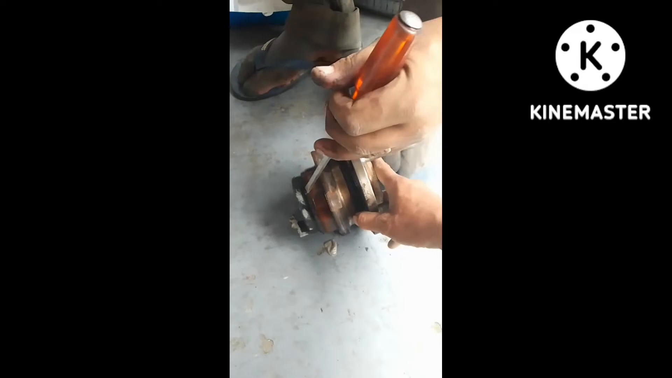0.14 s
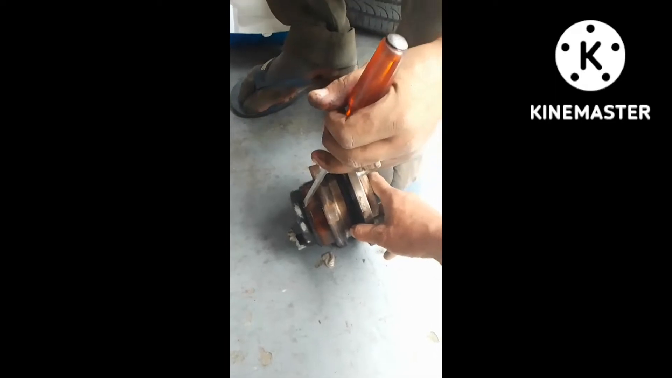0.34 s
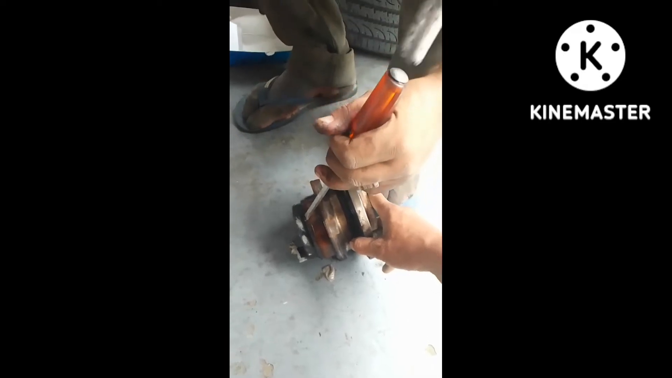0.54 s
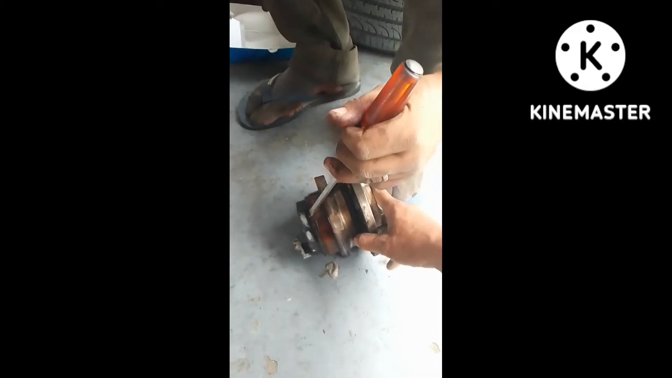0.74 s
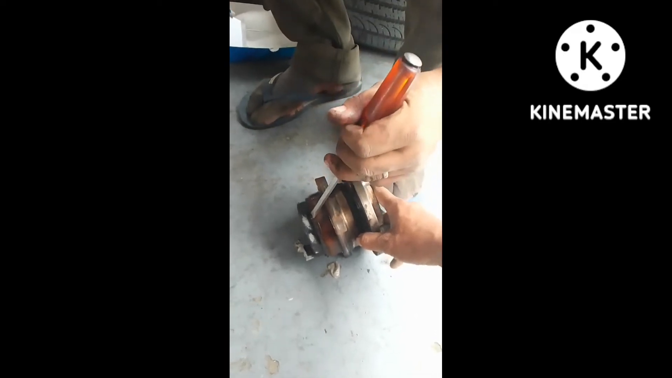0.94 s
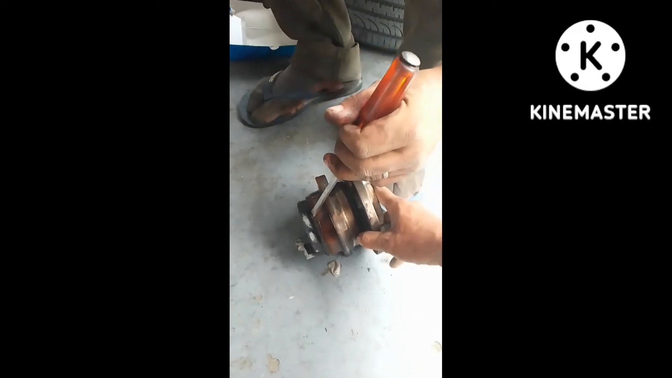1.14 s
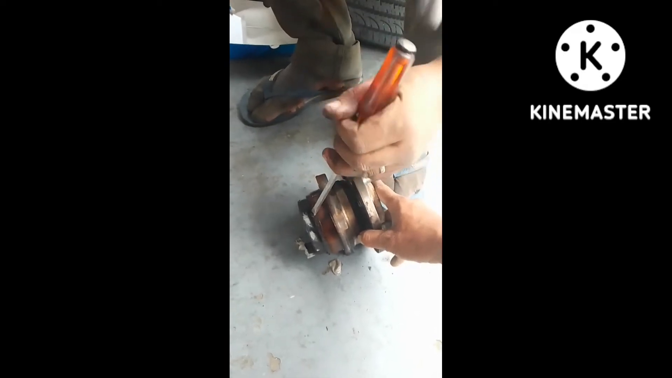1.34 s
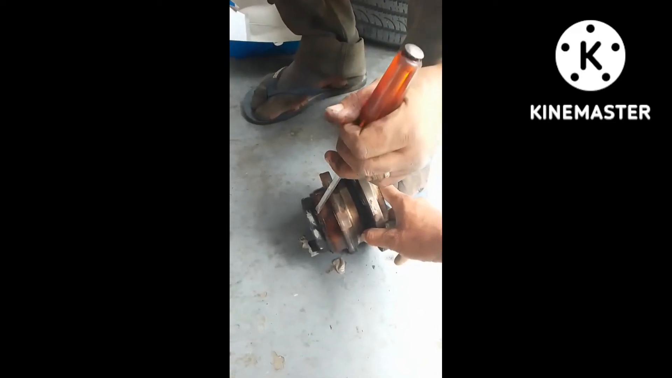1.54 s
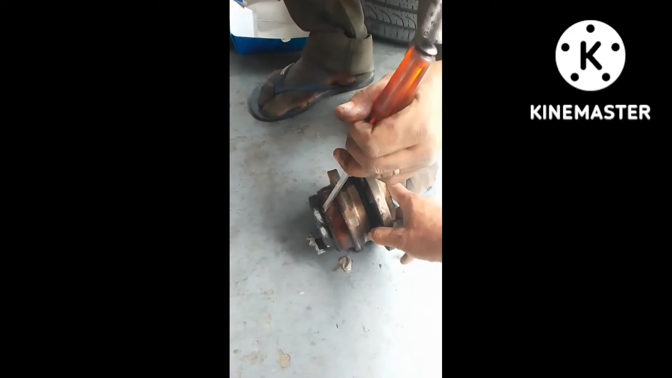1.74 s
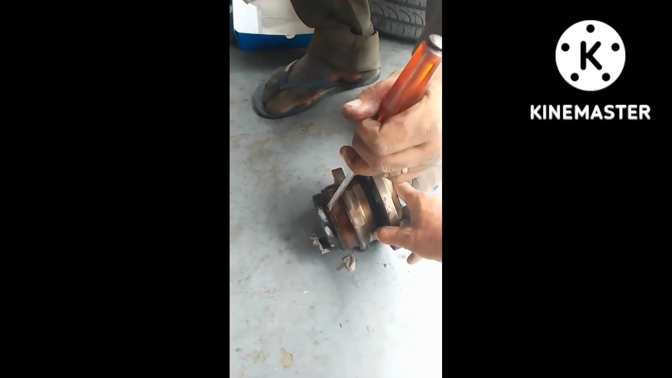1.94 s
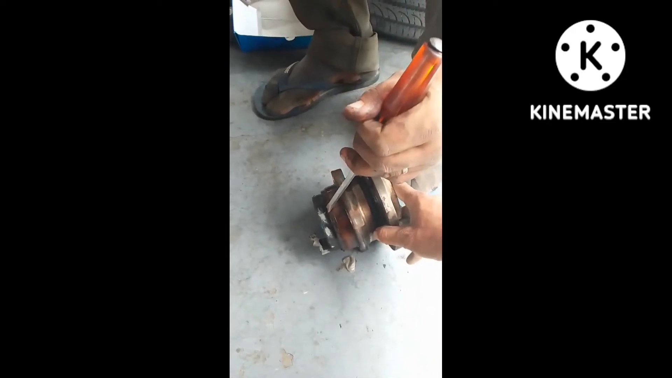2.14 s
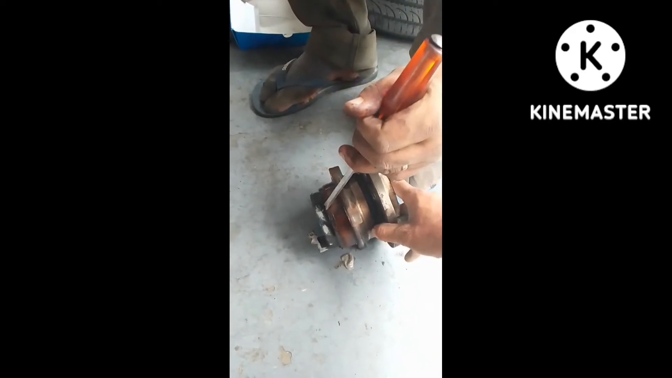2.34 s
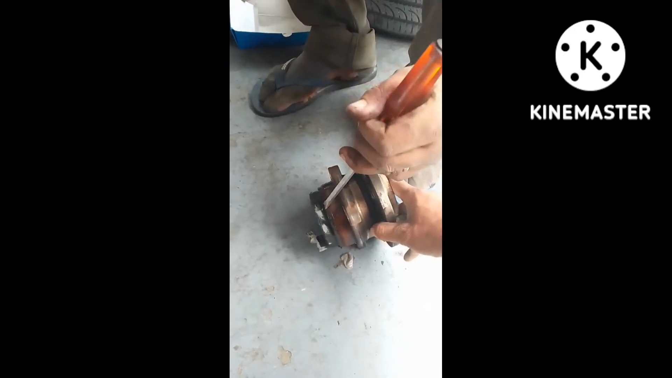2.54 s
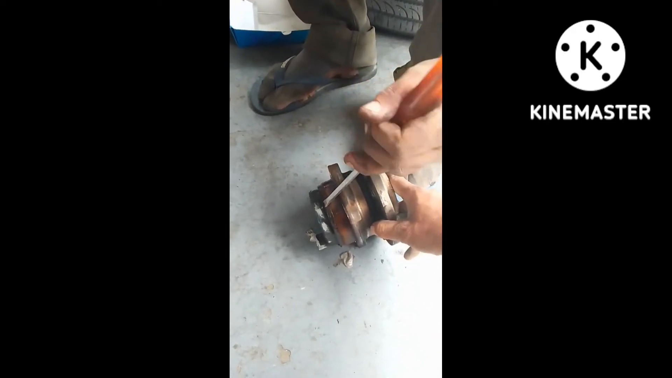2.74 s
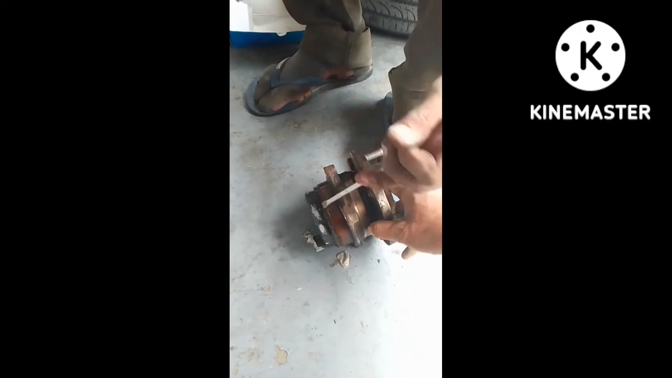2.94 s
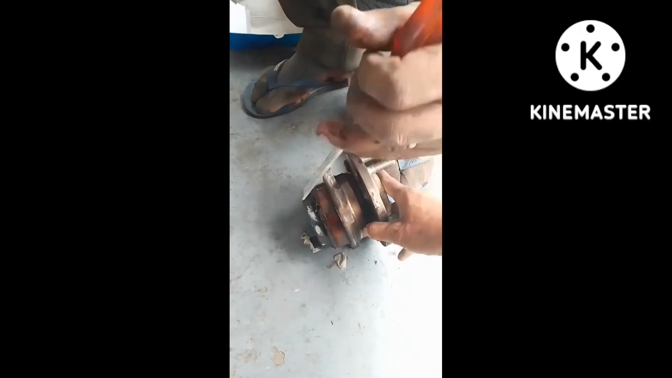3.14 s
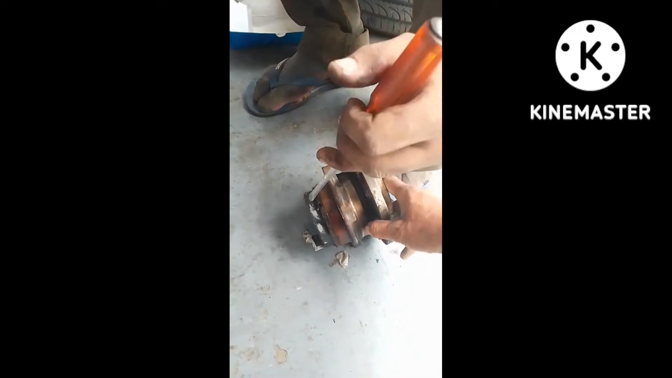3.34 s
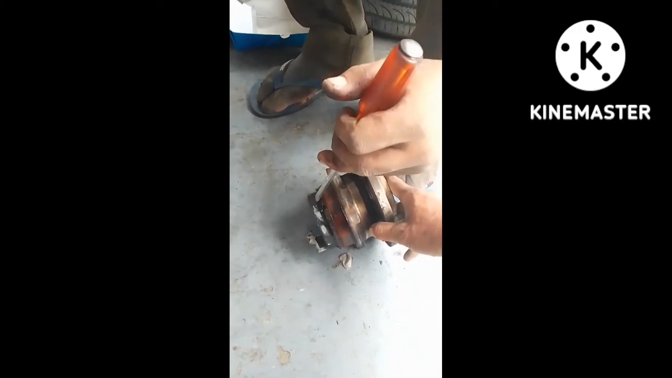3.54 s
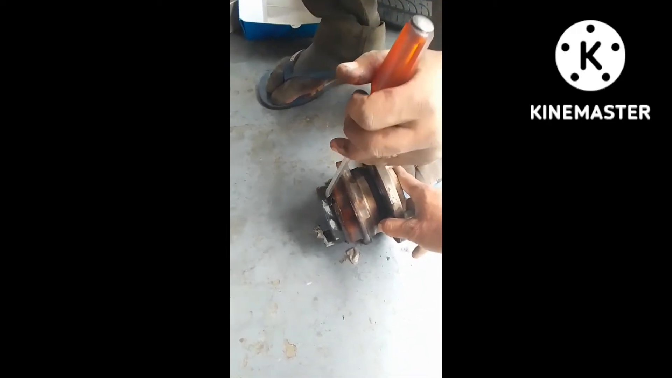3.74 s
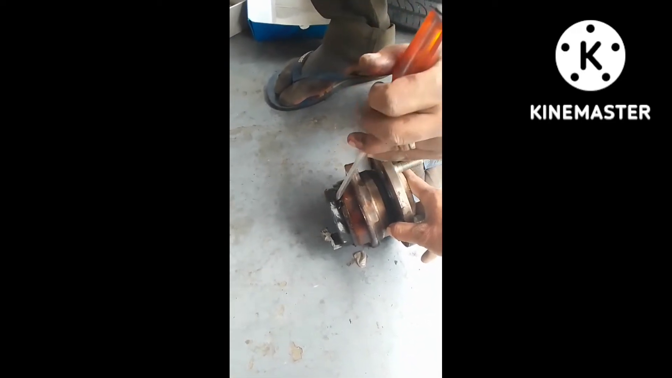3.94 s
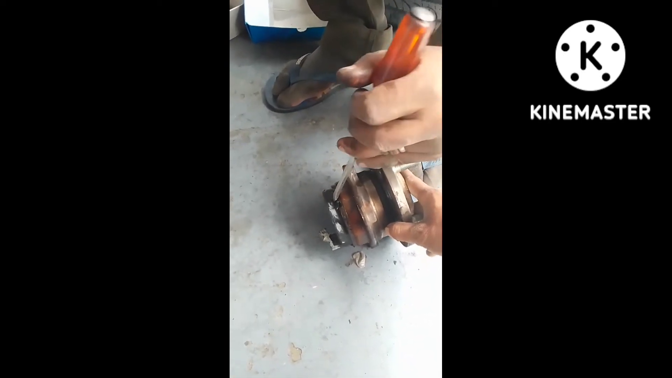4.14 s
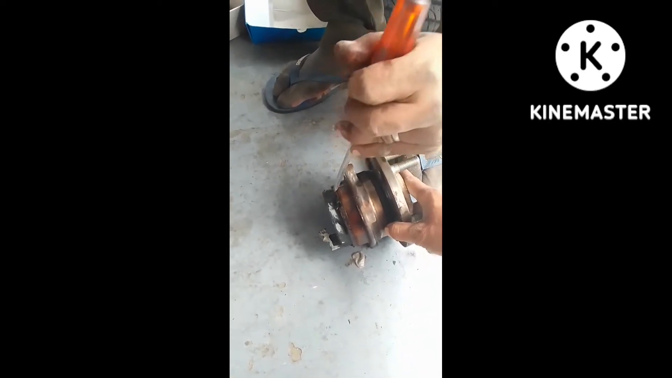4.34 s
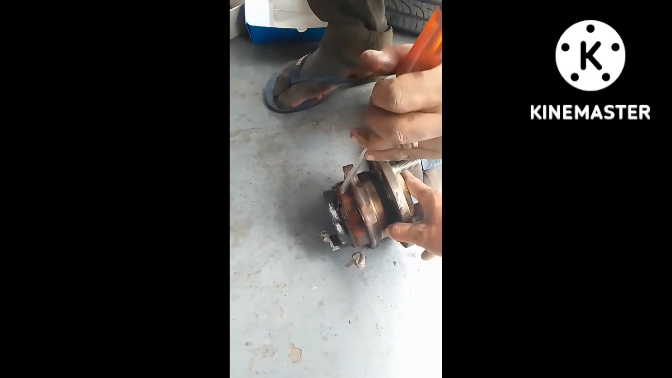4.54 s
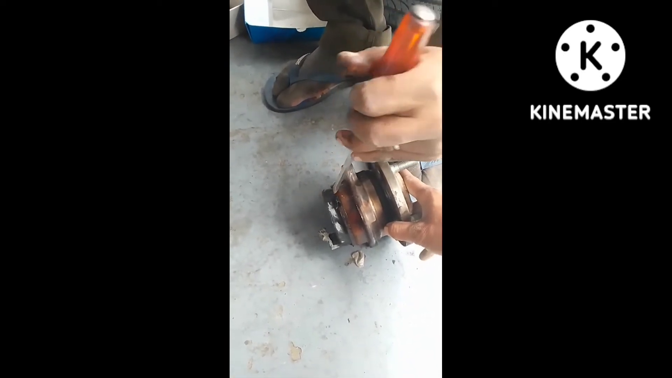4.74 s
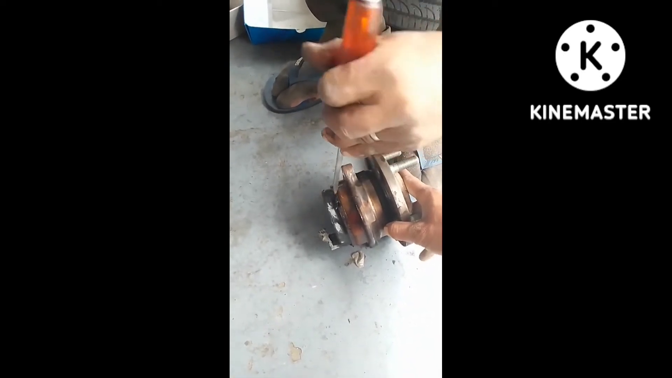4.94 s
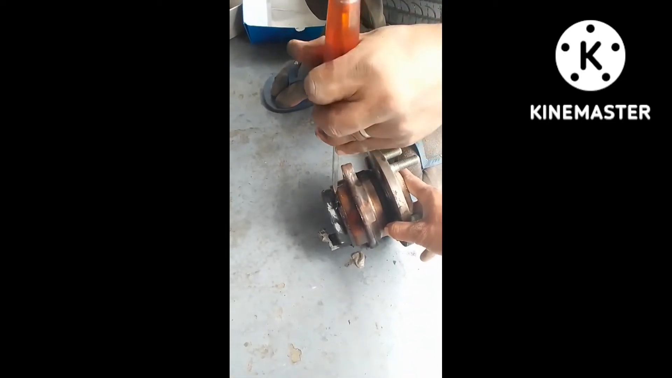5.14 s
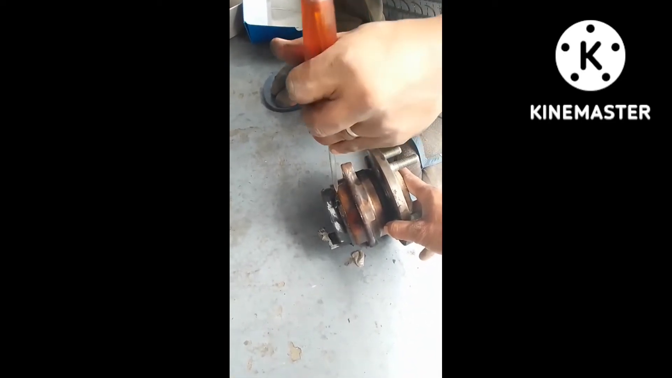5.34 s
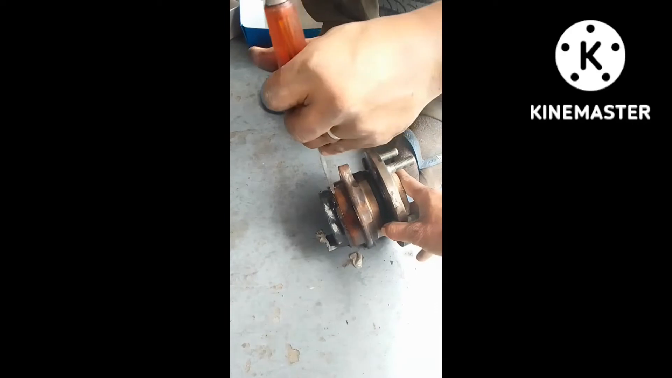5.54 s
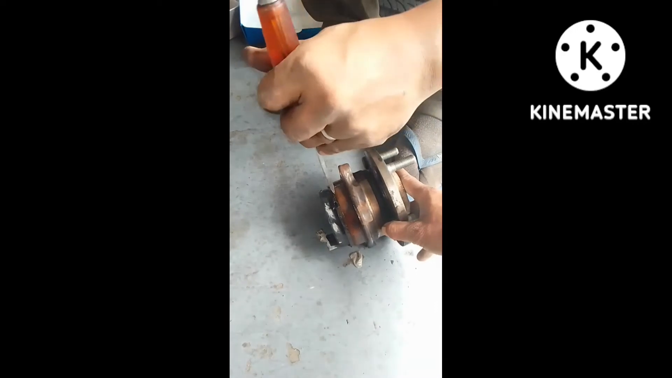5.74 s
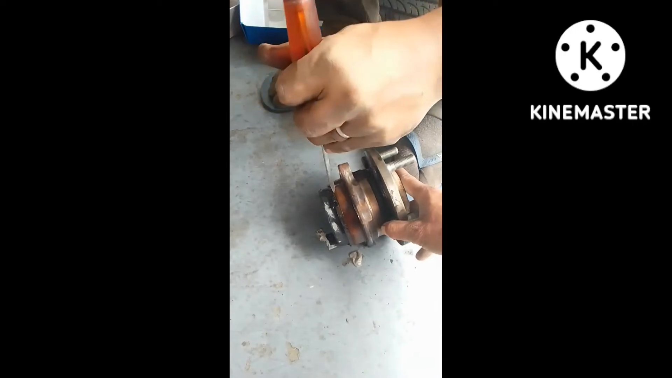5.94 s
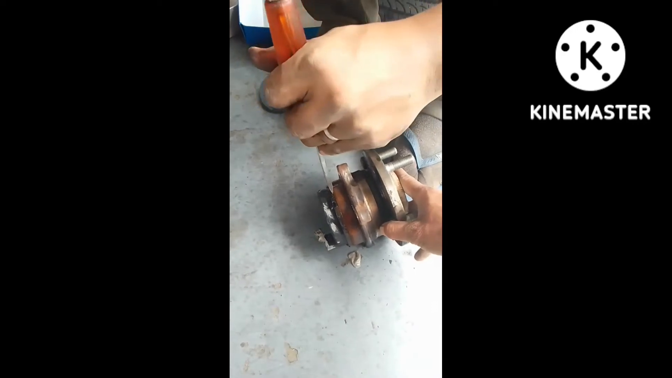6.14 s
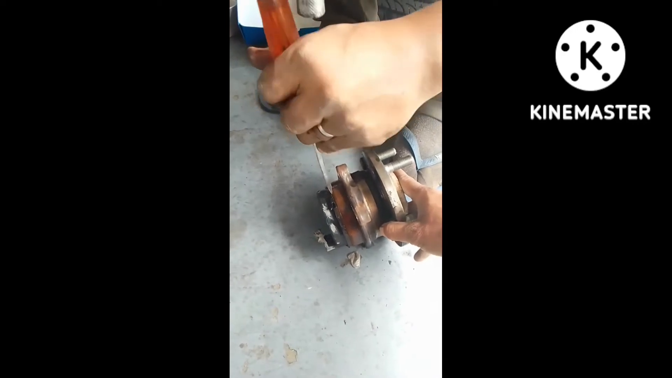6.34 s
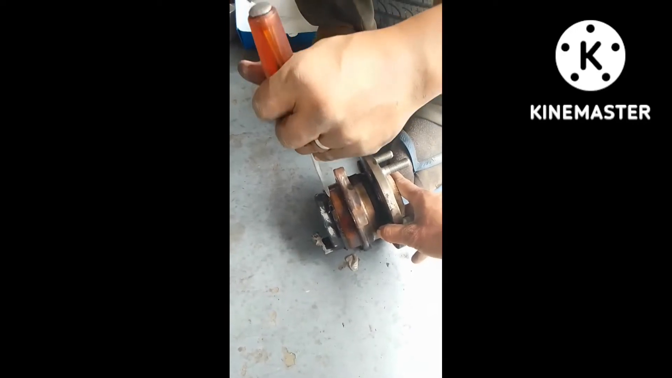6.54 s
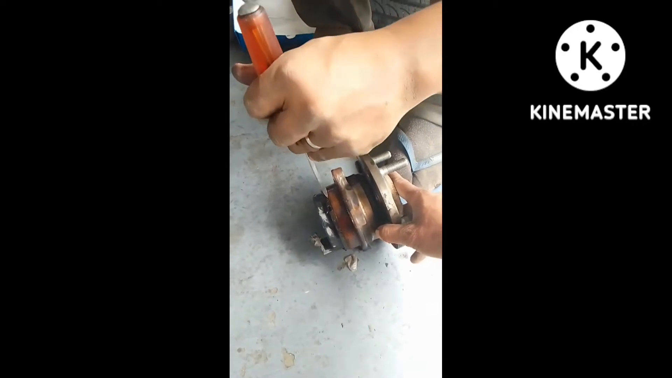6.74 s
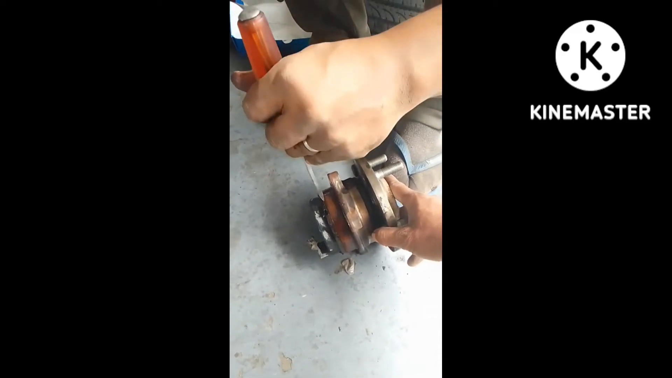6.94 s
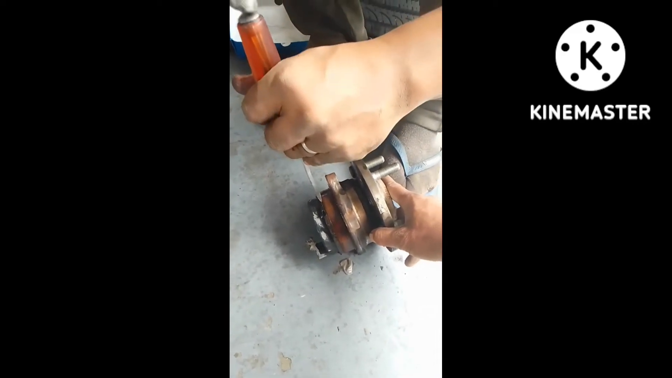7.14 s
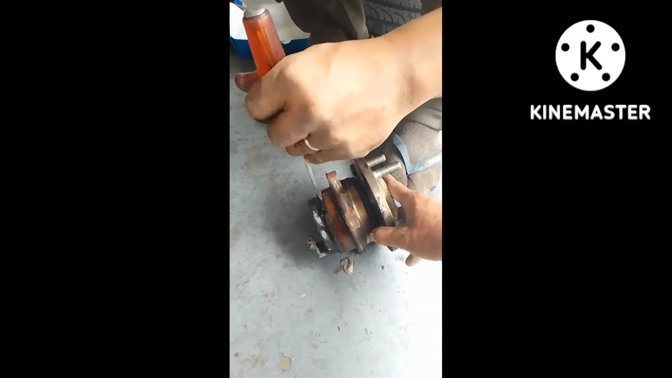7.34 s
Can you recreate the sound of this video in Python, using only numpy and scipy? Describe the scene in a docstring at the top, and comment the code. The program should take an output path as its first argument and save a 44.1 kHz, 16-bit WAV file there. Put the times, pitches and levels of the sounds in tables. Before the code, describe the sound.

The fading ring of an earlier blow and faint far knocks open the scene. Hard steel cracks follow, bright and clipped, with a dull thud from the concrete and a brief diffuse hall echo. After the last early strike, quiet machine air remains, with bumps on the phone, falling chirps and a distant clinking piece of metal. Weak taps and three drier strikes finish.

```python
"""A hammer drives a screwdriver into a steel hub on a concrete floor. A dying blow and far knocks come first, then
blows: noise bursts crack, the slab thuds, decaying modes ring hub, shank and hammer head, and a diffuse hall answers.
Weak and strong taps, dull one-pitch clicks and falling chirps lie between; a steel clink follows far off, then more
taps and last blows with a shorter hub ring. Bumps and rumble come through a phone's case, filtered noise and
wavering tones make the machines, and a look-ahead limiter ducks just before loud peaks."""
import sys
import numpy as np
from scipy import signal
from scipy.fft import rfft, irfft, next_fast_len
from scipy.io import wavfile
from scipy.ndimage import uniform_filter1d, minimum_filter1d, map_coordinates

SR = 44100
rng = np.random.default_rng(int(sys.argv[2]) if len(sys.argv) > 2 else 0)


def volts_from_decibels(level):
    """Turn decibel levels (scalar or array-like) into linear amplitude factors."""
    exponent = np.asarray(level, float) / 20
    return 10 ** exponent


def int16_out(signal):
    """Quantize to a 16-bit WAV file."""
    q = np.round(np.clip(np.atleast_2d(signal).T, -1, 1) * 32767)
    wavfile.write(sys.argv[1], SR, q.astype(np.int16))


N = 330309
LEAD = SR // 2  # samples kept ahead of time 0, so that an earlier blow can ring into the start
HEAVY_THUD_DB = -5  # what counts as a heavy thud

# hammer blows: (time [s], crack drive [dB], hub ring [dB], shank ring [dB], hammer-head ring [dB])
BLOWS = [(-.22, 9.5, 1, 1, -39), (0.5872, 7, -9.5, -3.5, -25.5), (.937, 19, 6, 10.5, -9.5),
         (1.312, 15, 9.5, 2, -16.5), (1.821, 13.5, -12, 12, -23), (2.131, 18.5, -14, 6.5, -16),
         (2.4506, 18, 4, 9, 1.5), (6.4234, 9.5, -6, 5, -8), (6.8779, 7, -11.5, -5.5, -16.5),
         (7.2439, 13.5, -1.5, 14, -28)]
# noise spectrum of steel cracking and scuffing: (frequency [Hz], relative density [dB per Hz])
CRACK = [(88, -20.5), (150, -54.5), (700, -26.5), (1500, -21.5), (2100, -12), (3160, -5.5), (3700, -6.5),
         (4160, -8), (6510, -17.5), (7180, -20.5), (8900, -29), (11000, -39.5), (13500, -38.5),
         (16000, -28)]


def unit(x):
    """Normalisation to unit rms, the root of the mean power."""
    return x / np.sqrt(np.mean(x ** 2) + 1e-20)


def along(points, hz):
    """Interpolation of (frequency, value) points on a logarithmic frequency axis."""
    f, v = np.transpose(points)
    return np.interp(np.log(hz + 1), np.log(f + 1), v)


def coloured(size, spectrum):
    """Spectral shaping: white noise weighted by the given spectrum, at rms 1."""
    m = next_fast_len(size)
    white = rfft(rng.standard_normal(m))
    shaped = white * volts_from_decibels(along(spectrum, np.fft.rfftfreq(m, 1 / SR)))
    return unit(irfft(shaped, m)[:size])


def wobble(rate):
    """Slow random modulation: a smooth curve through random knots, rate knots a second."""
    knots = rng.standard_normal(int(N * rate / SR) + 4)
    return map_coordinates(knots, [np.arange(N) * rate / SR])


def ring(modes, t, attack, scatter_db):
    """Modal superposition: decaying sines, each at a slightly new strength."""
    total = 0
    for hz, db, t60 in modes:
        decay = volts_from_decibels(db + scatter_db * rng.normal() - 60 * t / t60)
        total = total + decay * np.sin(2 * np.pi * hz * t)
    return (1 - np.exp(-t / attack)) * total


def in_hall(x, wet_db, onset=0.0032):
    """Diffuse reverberation: direct sound plus a fresh noise tail whose every frequency dies at its own speed."""
    # reverberation time: (frequency [Hz], t60 [s])
    decay_times = [(200, 0.287), (500, 0.51), (1000, 0.46), (2000, 0.62), (4000, 0.53), (7000, 0.4),
                   (12000, 0.45)]
    # initial spectrum of the tail: (frequency [Hz], relative level [dB])
    tail_colour = [(200, 13), (1000, 3.5), (3000, -3.5), (6000, 2.5), (12000, -1.5)]
    hz, t, z = signal.stft(rng.standard_normal(SR * 3 // 4), SR, nperseg=256)
    z = z * volts_from_decibels(along(tail_colour, hz)[:, None] - 60 * t / along(decay_times, hz)[:, None])
    tail = signal.istft(z, SR, nperseg=256)[1]
    tail = tail * (1 - np.exp(-np.arange(len(tail)) / SR / onset))
    wet = signal.fftconvolve(x, tail / np.linalg.norm(tail))
    return np.pad(x, (0, len(wet) - len(x))) + volts_from_decibels(wet_db) * wet


def add(track, s, x):
    """Linear superposition of x on the track at s seconds."""
    part = track[LEAD + round(s * SR):][:len(x)]
    part += x[:len(part)]


def thud_level(crack_db):
    """Impact scaling: the slab's thud [dB] grows a little less than the crack of a blow."""
    return -20.5 + .88 * crack_db


def hammer_blows(track):
    """Impact excitation: each blow makes a contact sound and rings the modes of shank and hammer head."""
    # screwdriver shank modes, plus a ring near 6 kHz shared with the hammer head:
    # (frequency [Hz], relative level [dB], t60 [s])
    shank = [(4768, 0, .065), (4785, -23, .27), (6020, -20, .09), (7345, -28, .16)]
    # hammer head modes: (frequency [Hz], relative level [dB], t60 [s])
    hammer = [(6035, -1, .09), (10112, 0, .16), (10137, -7, .16), (13550, -30, .08)]
    t = np.arange(SR // 3) / SR
    for s, crack_db, hub_db, shank_db, hammer_db in BLOWS:
        shank_ring = volts_from_decibels(shank_db) * ring(shank, t, .0006, 1)
        hammer_ring = volts_from_decibels(hammer_db) * ring(hammer, t, .004, 1)
        tools = shank_ring + hammer_ring
        # slender tools beam their ring at the phone, less of it fills the hall
        add(track, s, 0.39 * tools)
        struck = contact(t, crack_db, thud_level(crack_db), hub_db, is_late(s))
        add(track, s, in_hall(struck + 0.81 * tools, wet_db=-16.5))


def rebounds_and_taps(track):
    """Low-pass filtered impact: rebounds and taps, weak to strong, each dulled at its own treble limit."""
    # taps: (time [s], crack drive [dB], thud [dB], hub ring [dB], treble limit [Hz])
    taps = [(0.747, -26, -34, -41, 3600), (.766, -18, -35, -55, 1200), (1.3329, 15.5, -38, -5, 5000),
            (2.157, 8, -12.5, -29, 5000), (2.475, 0, -18.5, -9, 5000), (4.551, -20, -70, -35.5, 9050),
            (5.993, -43, -39.5, -53, 2020), (6.004, -26.5, -34.5, -30.5, 12000),
            (6.051, -41, -42.5, -40.5, 6020), (6.081, -51, -61, -55, 6050)]
    t = np.arange(SR // 3) / SR
    for s, crack_db, thud_db, hub_db, limit_hz in taps:
        low_pass = signal.butter(2, limit_hz, fs=SR, output="sos")
        touch = contact(t, crack_db, thud_db, hub_db, is_late(s))
        add(track, s, in_hall(signal.sosfilt(low_pass, touch), wet_db=-18.0))


def is_late(s):
    """Change of modal damping with time: contacts after 5 s have a weaker flange tone and a shorter hub ring."""
    return s > 5


def contact(t, crack_db, thud_db, hub_db, late=False):
    """Broadband impact plus modal response: a crack, a knock in the slab and the ring of hub and flange."""
    # hub modes: (frequency [Hz], relative level [dB], t60 [s])
    hub_modes = [(1490, -20, .12), (2821, 0, .09), (2833, -15, .3)]
    # very short modes of the casting: (frequency [Hz], relative level [dB], t60 [s])
    casting = [(2300, -11, .01), (3340, -7, .011), (3600, -3, .011), (3850, -2, .012), (4100, -8, .01)]
    # hub flange modes: (frequency [Hz], relative level [dB], t60 [s])
    flange = [(944, 1.5, 0.066), (996, -2.5, 0.061)]
    # concrete slab modes: (frequency [Hz], relative level [dB], t60 [s])
    slab = [(257.3, -19.5, 0.19), (338.7, 2, 0.038), (403.6, 1.5, 0.035), (447.7, -10.5, 0.081)]
    # the tip skids and chatters for some milliseconds after the snap
    burst = (1 - np.exp(-t / 0.00054)) * (volts_from_decibels(-60 * t / 0.016) + 0.17 * volts_from_decibels(-60 * t / 0.21))
    sound = volts_from_decibels(crack_db - 4.5) * burst * coloured(len(t), CRACK)
    sound += volts_from_decibels(crack_db + 8.0) * ring(casting, t, attack=0.0015, scatter_db=4)
    # bowing of the flange grows 2.1 dB per dB of thud, so only heavy knocks bring it out
    bow_db = -5.5 + 2.1 * (thud_db - HEAVY_THUD_DB)
    if late:  # weaker flange tone, shorter hub ring
        bow_db = bow_db - 14
        hub_modes = [(hz, db, min(t60, 0.11)) for hz, db, t60 in hub_modes]
    sound += volts_from_decibels(bow_db) * ring(flange, t, attack=0.0011, scatter_db=2)
    sound += volts_from_decibels(thud_db) * ring(slab, t, attack=0.0029, scatter_db=1)
    return sound + volts_from_decibels(hub_db) * ring(hub_modes, t, attack=0.00138, scatter_db=0.28)


def dull_clicks(track):
    """Heavily damped resonance: a short rattle of dull clicks near 0.75 s, dull knocks within the taps near 6 s."""
    # clicks: (time [s], drive [dB], pitch [Hz])
    clicks = [(.7473, -26, 1900), (0.75, -20.5, 1704), (0.7534, -30, 1110), (0.7602, -27, 560),
              (0.767, -31, 494), (5.992, -39, 800), (6.005, -30, 1710), (6.0505, -33, 1700)]
    t = np.arange(SR // 20) / SR
    for s, db, hz in clicks:
        mode = (hz, db + 4.5, 6.5 / hz)  # 6.5 cycles to die by 60 dB
        add(track, s, in_hall(ring([mode], t, .0001, 1), wet_db=-20))


def steel_clinks(track):
    """Modal radiation at a distance: a small steel piece scuffs and rings under more echo than direct sound."""
    # clinks: (time [s], drive [dB], spectral tilt about 4 kHz [dB per octave])
    clinks = [(4.335, -31, 5.5), (4.364, -39, 8), (4.396, -33, -1.5)]
    # modes of the piece: (frequency [Hz], relative level [dB], t60 [s])
    piece = [(2288, -6, .13), (3817, 0, .1), (5744, -13, .11), (7900, -22, .07), (8893, -28, .08)]
    t = np.arange(SR // 3) / SR
    for s, db, tilt_db in clinks:
        modes = [(hz, level + tilt_db * np.log2(hz / 4000), t60) for hz, level, t60 in piece]
        scuff = volts_from_decibels(-15.5 - 60 * t / 0.21) * (1 - np.exp(-t / .008)) * coloured(len(t), CRACK)
        rattle = volts_from_decibels(3 * wobble(90)[:len(t)])
        clink = scuff + rattle * ring(modes, t, 0.0053, 0.86)
        add(track, s, volts_from_decibels(db) * in_hall(clink, wet_db=3.0))


def far_knocks(track):
    """Reverberant field beyond the direct one: low-passed contacts across the hall, mostly echo."""
    # knocks: (time [s], crack drive [dB])
    knocks = [(.108, -32), (.13, -36), (.19, -44)]
    t = np.arange(SR // 3) / SR
    dull = signal.butter(4, 5200, fs=SR, output="sos")
    for s, db in knocks:
        knock = contact(t, db, thud_db=db - 23, hub_db=db - 13)
        add(track, s, in_hall(signal.sosfilt(dull, knock), wet_db=6.0))


def far_chirps(track):
    """Frequency modulation through a resonance: hoarse chirps fall from one pitch at one mean rate."""
    # chirps: (time [s], drive [dB], length [s])
    chirps = [(1.737, -39.5, 0.1), (2.712, -37.5, 0.052), (2.776, -40.5, 0.048), (3.553, -46, 0.0665),
              (4.678, -39, 0.074), (6.693, -40.5, 0.082)]
    start_hz, mean_fall_hz_per_s = 5000, 46000
    for s, db, length in chirps:
        u = np.arange(round(length * SR)) / (length * SR)
        hz = start_hz - mean_fall_hz_per_s * length * (1 - (1 - u) ** 1.6)
        phase = 2 * np.pi * np.cumsum(hz) / SR
        throat = volts_from_decibels(-22 * np.log2(hz / 3700) ** 2)  # loudest near one resonance
        rasp = throat * wobble(800)[:len(u)]  # hoarse
        chirp = np.sin(np.pi * u ** .7) * rasp * np.sin(phase)
        add(track, s, volts_from_decibels(db) * in_hall(chirp, wet_db=6))


def low_thumps():
    """One-sided pulse: a low thump under each blow, perhaps from uneven clipping and limiting."""
    track = np.zeros(LEAD + N)
    length_s = 0.011
    pulse = np.sin(np.pi * np.arange(round(length_s * SR)) / (length_s * SR)) ** 2
    for s, crack_db, *_ in BLOWS:
        # stronger for harder blows: 1.4 dB per dB of thud
        thump_db = -50 + 1.4 * (thud_level(crack_db) - HEAVY_THUD_DB)
        add(track, s, volts_from_decibels(thump_db) * pulse)
    return track[LEAD:]


def case_bumps():
    """Windowed resonance: soft bumps on the phone's case, two and a half cycles each."""
    # bumps: (time [s], level [dB])
    bumps = [(0.184, -41), (1.175, -40), (1.218, -38), (1.26, -43), (1.451, -43), (3.319, -62),
             (3.512, -55), (3.72, -48), (3.759, -41), (3.837, -50), (3.999, -53), (4.041, -61)]
    track = np.zeros(LEAD + N)
    case_hz = 244
    u = np.arange(round(2.5 * SR / case_hz)) * case_hz / SR  # cycles
    for s, db in bumps:
        add(track, s, volts_from_decibels(db) * np.sin(np.pi * u / 2.5) ** 2 * np.sin(2 * np.pi * u))
    return track[LEAD:]


def hand_rumble():
    """Amplitude-modulated noise: the holding hand's lumpy low rumble through the case."""
    # course of the rumble: (time [s], level [dB])
    course = [(0.0, -71), (0.33, -80), (0.6, -93), (1.35, -84), (1.56, -76.5), (1.94, -75), (3.0, -102),
              (3.27, -80), (5.74, -100), (7.49, -87.5)]
    # its spectrum: (frequency [Hz], relative density [dB per Hz])
    rumble_colour = [(25, -17.5), (60, -3), (110, -4.5), (170, -3.5), (260, -31), (400, -88)]
    when, level_db = np.transpose(course)
    lumps = volts_from_decibels(np.interp(np.arange(N) / SR, when, level_db) + 3 * wobble(9))
    return lumps * coloured(N, rumble_colour)


def workshop_air():
    """Stationary broadband noise: the murmur of machines, its level barely wavering."""
    # murmur spectrum: (frequency [Hz], relative density [dB per Hz])
    murmur = [(18, -59), (30, -40), (179, -70), (215, -1.5), (449, 1.5), (822, -5.5), (1250, -7),
              (2170, -2.5), (2900, -5.5), (3870, 1.5), (4300, -11.5), (5040, -3.5), (5450, -11.5),
              (8080, -18), (11500, -24), (16000, -26.5)]
    level_db = -53.5 + 0.197 * wobble(1.87) + 0.17 * wobble(12)
    return volts_from_decibels(level_db) * coloured(N, murmur)


def machine_whine():
    """Narrow-band tones: steady machine lines broadened by random level and phase modulation."""
    # whines: (frequency [Hz], relative level [dB])
    whines = [(813, -69.5), (920, -71), (3833, -82), (4597, -69.5), (5157, -77), (5932, -78), (7779, -82),
              (8376, -79)]
    t = np.arange(N) / SR
    total = np.zeros(N)
    for hz, db in whines:
        strength = volts_from_decibels(db + 4.5 + 2.18 * wobble(15))
        total += strength * np.sin(2 * np.pi * hz * t + 1.5 * wobble(32.0))
    return total


def scene():
    """High-pass at the microphone port: blows, taps, clicks and far sounds lose bass; the rest does not pass it."""
    track = np.zeros(LEAD + N)
    hammer_blows(track)
    rebounds_and_taps(track)
    dull_clicks(track)
    steel_clinks(track)
    far_knocks(track)
    far_chirps(track)
    port = signal.butter(3, 170, "high", fs=SR, output="sos")
    airborne = signal.sosfilt(port, track)[LEAD:]
    through_case = case_bumps() + hand_rumble()
    return (airborne + low_thumps() + through_case + workshop_air() + machine_whine())[None]


def limiter(x):
    """Look-ahead gain control: peaks within the next 45 ms set the cut, which then decays exponentially."""
    ahead = round(.045 * SR)
    peak = -minimum_filter1d(-np.abs(x), ahead, origin=-(ahead // 2), mode="nearest")
    duck_db = 20 * np.log10(np.maximum(peak / .7, 1)) + 1e-3  # cut above a peak of 0.7
    release = np.arange(N) / SR / 0.12  # the cut shrinks with a time constant of 0.12 s
    duck_db = np.exp(np.maximum.accumulate(np.log(duck_db) + release) - release)
    return x * volts_from_decibels(-uniform_filter1d(duck_db, size=160, origin=79))  # glides over 160 samples


def treble_end(x):
    """Band limitation: the treble drops by 16 dB at 15.5 kHz and ends at 16.48 kHz."""
    hz = np.fft.rfftfreq(2 * N, 1 / SR)

    def past(edge_hz):
        """Smooth step from 0 to 1 about one edge."""
        return .5 + .5 * np.tanh((hz - edge_hz) / 40)

    gain_db = -16 * past(15500) - 78 * past(16480)
    return irfft(rfft(x, 2 * N) * volts_from_decibels(gain_db))[:N]


def roll_off(x):
    """The treble ends steeply here."""
    return signal.sosfilt(signal.butter(12, 16530, fs=SR, output="sos"), x)


def record(dry):
    """Saturation, gain control and band limitation in turn: the microphone clips softly towards 5.6."""
    clipped = dry[0] / (1 + np.abs(dry[0] / 5.6) ** 6) ** (1 / 6)
    mix = treble_end(limiter(clipped))
    return roll_off(mix[None])


dry = scene()
out = record(dry)
int16_out(out)
```